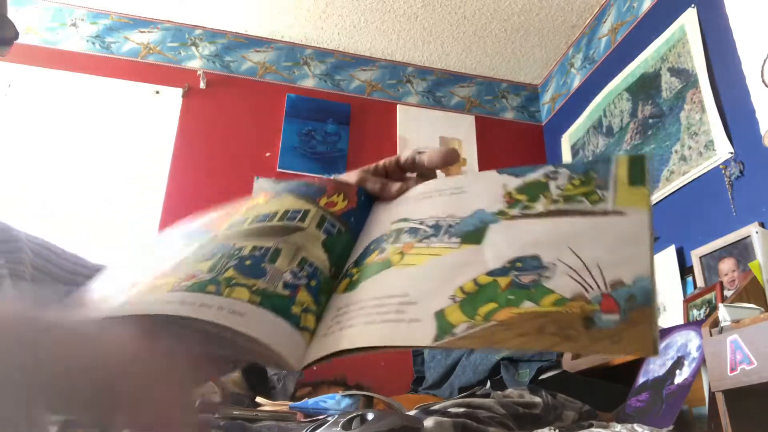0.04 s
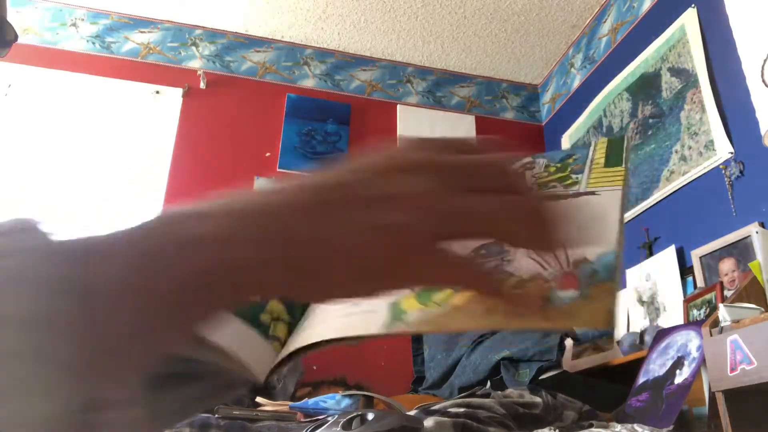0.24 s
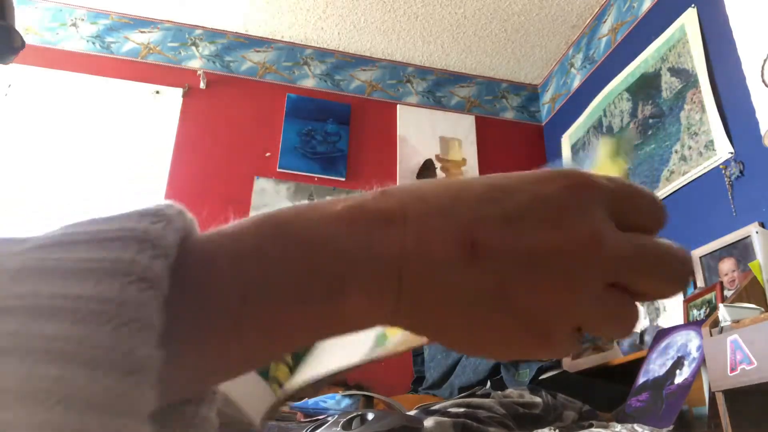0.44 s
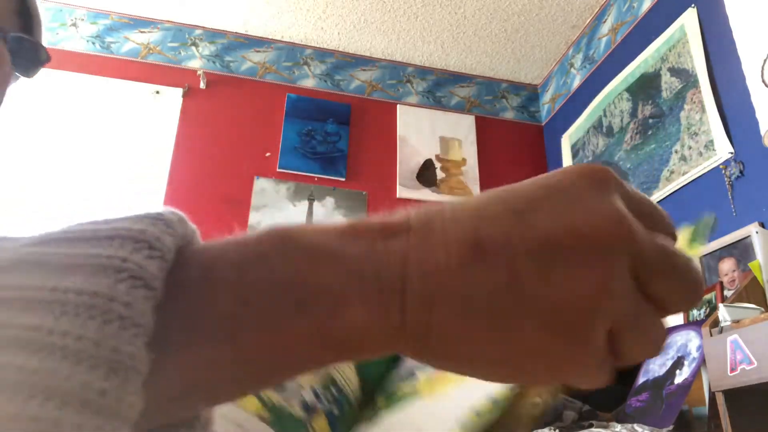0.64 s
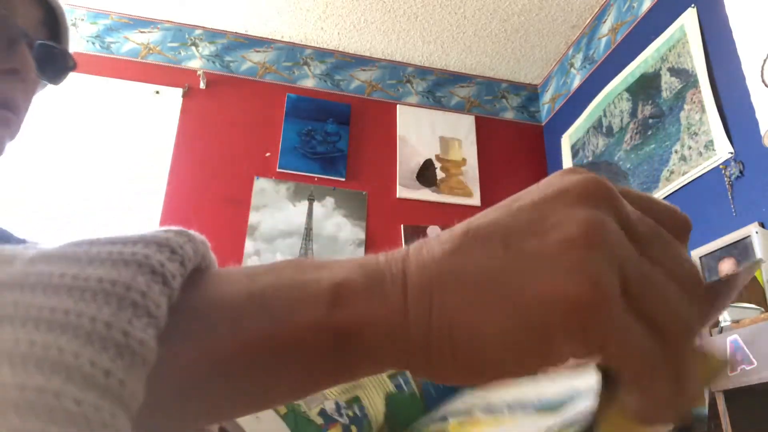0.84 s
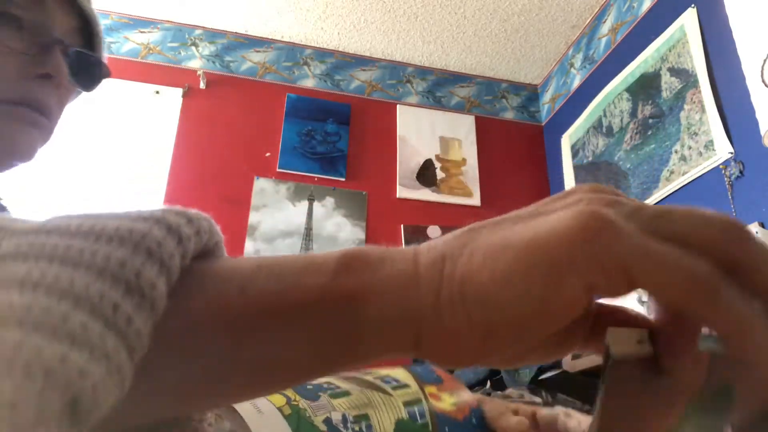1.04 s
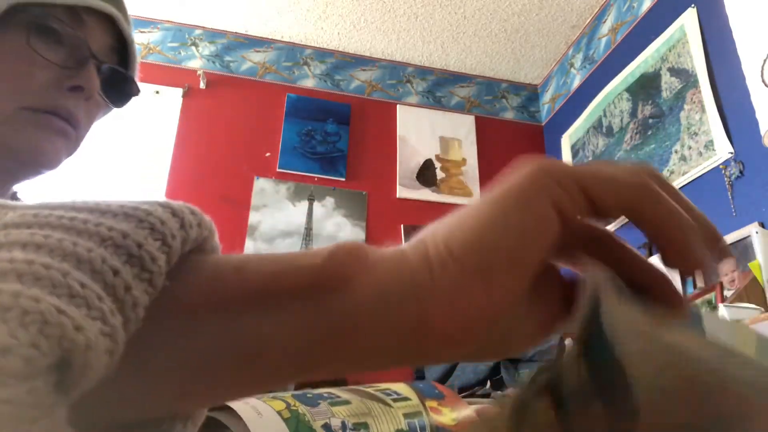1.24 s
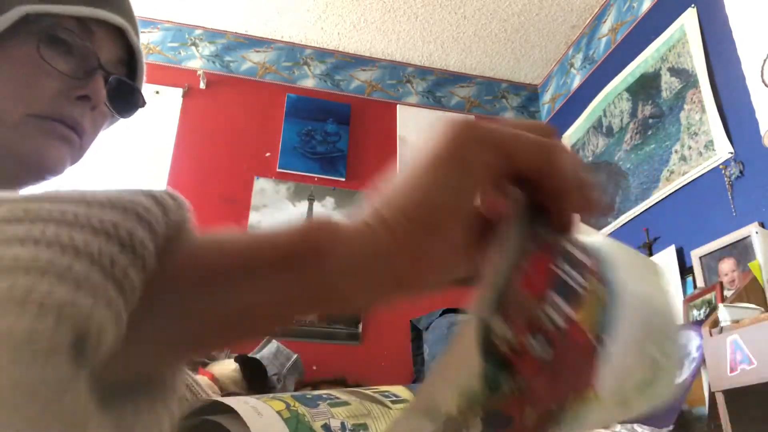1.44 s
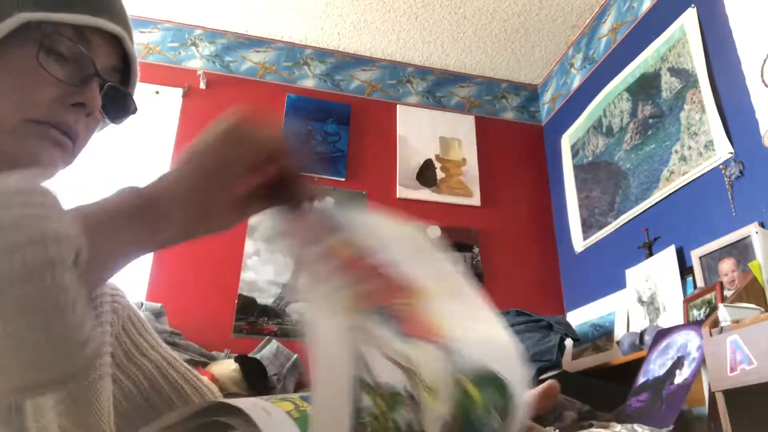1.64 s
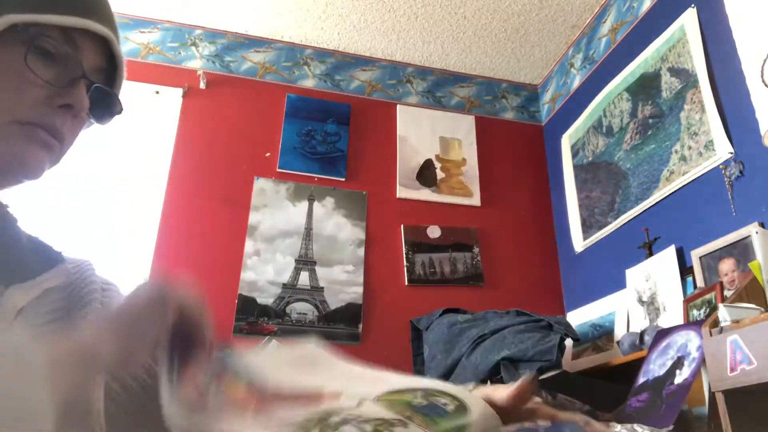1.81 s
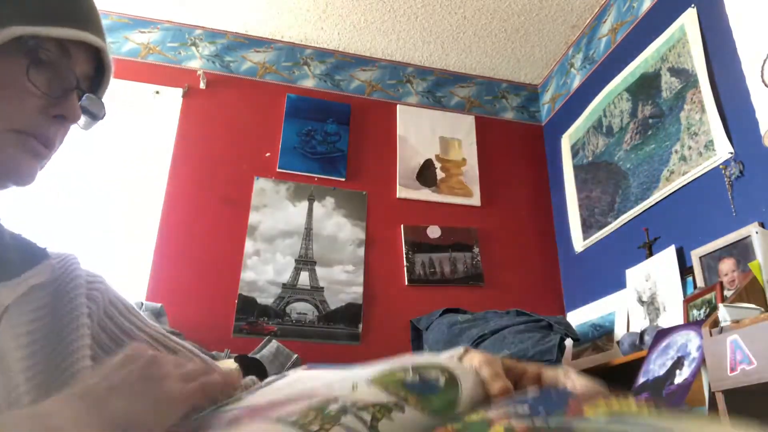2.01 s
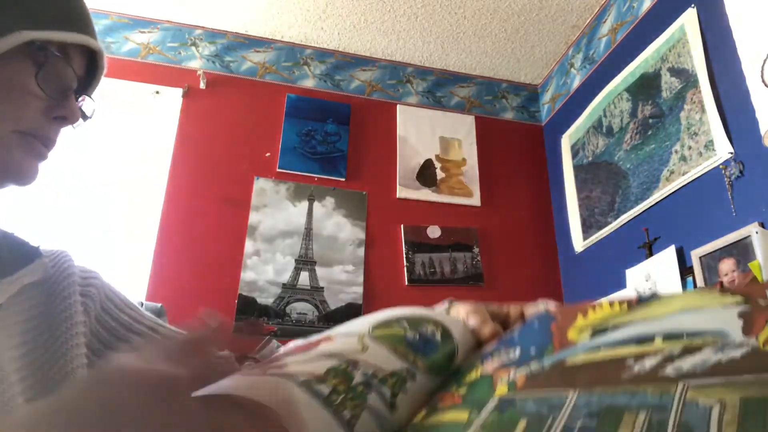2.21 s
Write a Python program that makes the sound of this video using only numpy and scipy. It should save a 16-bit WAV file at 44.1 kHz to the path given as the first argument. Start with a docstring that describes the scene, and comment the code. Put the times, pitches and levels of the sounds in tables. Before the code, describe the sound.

One thick picture-book page is lifted and turned by hand in a small quiet room, heard close; light rubbing grows into crisp rustling, sharp flaps and a slap, then brief soft brushing strokes.

```python
"""Turning a stiff picture-book page

A hand slides over a picture book, lifts one stiff page and turns it, close by in a quiet room. Slides are
grainy friction noise; the sheet buckles in short snaps whose bending waves arrive treble first.
Its edge sings in sinking bands, it wobbles in a low resonance, small patches ping and creases crackle;
the page slaps down on the others and the hand smooths it flat."""
import sys
import numpy as np
from scipy import signal
from scipy.fft import rfft, irfft
from scipy.io import wavfile
from scipy.ndimage import uniform_filter1d

SR = 44100
rng = np.random.default_rng(int(sys.argv[2]) if len(sys.argv) > 2 else 0)


def int16_out(signal):
    """Quantize to a 16-bit WAV file."""
    q = np.round(np.clip(np.atleast_2d(signal).T, -1, 1) * 32767)
    wavfile.write(sys.argv[1], SR, q.astype(np.int16))


N = 100062  # samples in the scene
SIZE = 32768  # samples in each separate sound
T = np.arange(SIZE) / SR  # s
HZ = np.fft.rfftfreq(SIZE, 1 / SR) + 1e-3  # kept just above zero for the divisions


def amp(db):
    """Decibels to gain."""
    return 10 ** (np.asarray(db) / 20)


def evened(x):
    """Scales to rms 1."""
    return x / np.sqrt(np.mean(x ** 2) + 1e-20)


def read(points, hz):
    """Reads a curve on a log-frequency axis."""
    point_hz, value = np.transpose(points)
    return np.interp(np.log(hz + 1), np.log(point_hz + 1), value)


def add(mix, start_s, sound):
    """Mixes a sound in at a time, trimmed to the ends of the scene."""
    start = round(start_s * SR)
    part = mix[max(start, 0):][:len(sound) + min(start, 0)]
    part += sound[max(-start, 0):][:len(part)]


# Tone of the quiet room. Each row: frequency in Hz, gain in dB.
AIR_COLOUR = [(25, -39), (50, -2.5), (105, 8), (220, -0.5), (600, -7), (1100, -5.5), (7000, -18),
              (16000, -29.5)]
AIR_DB = -70


def room_air():
    """Steady noise, coloured as the air of a quiet room."""
    spectrum = rfft(rng.standard_normal(N))
    colour_db = read(AIR_COLOUR, np.fft.rfftfreq(N, 1 / SR))
    return amp(AIR_DB) * evened(irfft(spectrum * amp(colour_db), N))


GRAINS_PER_S, GRAIN_SPREAD_DB = 2500, 2.5
GRAIN_SHARE = 0.58  # share of the power in grains, the rest in fine hiss


def friction(colour_db):
    """Paper fibres catch and let go: grains of uneven size in a fine hiss; rms 1."""
    size_db = GRAIN_SPREAD_DB * np.minimum(rng.exponential(1, SIZE), 4)
    catches = rng.random(SIZE) < GRAINS_PER_S / SR
    grains = evened(amp(size_db) * catches * rng.choice([-1, 1], SIZE))
    fine = rng.standard_normal(SIZE)
    x = np.sqrt(GRAIN_SHARE) * grains + np.sqrt(1 - GRAIN_SHARE) * fine
    return evened(irfft(rfft(x) * amp(colour_db)))


# Tone of the sheet's dull body under a slide. Each row: frequency in Hz, gain in dB.
BODY_COLOUR = [(60, -17), (250, -4.5), (650, 0.5), (1150, 1.5), (2300, -13.5), (4000, -34), (12000, -57)]
# Tone of the paper's surface hiss, before each slide's own tilt. Each row: frequency in Hz, gain in dB.
HISS_COLOUR = [(300, -24), (1500, -6), (2600, -3.5), (6500, -2), (9000, -9), (14000, -8.5)]
# Fingers and paper slide. Each row: start in seconds, rise in seconds, length in seconds, fade over the
# stroke in dB (negative sinks), body level in dB, hiss level in dB, hiss tilt above 2 kHz in dB/octave.
SLIDES = [ (0.119, 0.018, 0.22, -9.5, -73.5, -71, -3), (0.453, 0.035, 0.082, -4.5, -63.5, -65, -3),
          (0.714, 0.033, 0.17, -6.5, -55.5, -52.5, -9.5), (0.868, 0.022, 0.23, 2.5, -60.5, -61.5, -7.5),
          (1.104, 0.017, 0.076, -8, -55, -53, -7.5), (1.205, .04, .11, -8, -48, -50.5, -9),
          (1.309, 0.021, 0.063, -7, -45.5, -46, -4.5), (1.374, 0.034, 0.045, 0, -43, -55.5, -9),
          (1.502, 0.04, 0.027, -4, -42, -51, -5), (1.552, 0.024, 0.075, -11.5, -56, -63.5, -14.5),
          (1.694, 0.013, 0.088, -1, -41, -64, -23), (1.821, 0.0048, 0.15, -15, -53.5, -56.5, -6.5),
          (1.955, 0.0035, 0.17, -4.5, -61, -53.5, -4), (2.11, 0.0032, .14, -11.5, -62, -51.5, -11)]
RELEASE_S, FLUTTER_DB = 0.02, 2


def stroke(start_s, rise_s, length_s, fade_db, body_db, hiss_db, tilt_db):
    """A slide under wavering pressure: the sheet's dull body and the hiss of its surface."""
    slow = uniform_filter1d(rng.standard_normal(SIZE), size=400)
    pressure = evened(uniform_filter1d(slow, size=200))
    shape = np.minimum(T / rise_s, 1) * np.exp(-np.maximum(T - length_s, 0) / RELEASE_S)
    shape *= amp(fade_db * np.minimum(T / length_s, 1) + FLUTTER_DB * pressure)
    body = friction(read(BODY_COLOUR, HZ))
    hiss = friction(read(HISS_COLOUR, HZ) + tilt_db * np.log2(np.maximum(HZ, 2000)))
    return start_s, shape * (amp(body_db) * body + amp(hiss_db) * hiss)


# How long the room rings. Each row: frequency in Hz, time to fall by 60 dB in seconds.
ROOM_DECAY = [(300, 0.34), (1100, 0.32), (3000, 0.14), (16000, 0.19)]
ROOM_RISE_S = 0.0013


def room():
    """Spectrum of the room's tail, energy 1: noise that dies at its own pace in each band."""
    hz, t, z = signal.stft(rng.standard_normal(SIZE), SR, nperseg=256)
    decay = np.exp(-np.log(1000) * t / read(ROOM_DECAY, hz)[:, None])
    tail = signal.istft(z * decay, SR, nperseg=256)[1][:SIZE]
    tail *= (1 - np.exp(-T / ROOM_RISE_S)) ** 2
    return rfft(tail / np.linalg.norm(tail))


def burst(decay_s):
    """Spectrum of a spray of tiny clicks that swells and dies, energy 1."""
    x = rng.standard_normal(SIZE) * np.sqrt(T) * np.exp(-T / decay_s)
    return rfft(x / np.linalg.norm(x))


# Colour of the paper in a snap. Each row: frequency in Hz, gain in dB.
PAPER_COLOUR = [(40, 4), (330, 3), (620, 0), (1100, 2.5), (1900, -1), (2500, 2), (8000, 0.5), (16000, -44)]
# Colour of the tick at the paper's edge. Each row: frequency in Hz, gain in dB.
TICK_COLOUR = [(500, -41), (3000, 5.5), (7000, -0.5), (10000, -5), (14000, -7.5)]
# Sheet resonances rung by the rattle. Each row: frequency in Hz, peak gain in dB, width in Hz.
RATTLE_MODES = [(330.4, 7, 8.9), (1096, 1.5, 36), (2294, -2, 71)]
# The sheet buckles or lands. Each row: time in seconds, level in dB, corner in Hz, fall above the corner
# in dB/octave, low edge in Hz, edge tick in dB, rattle in dB against the clean pulse.
BUCKLES = [ (0.1213, -11.5, 2830, 35, 1700, -35.5, -13), (0.6276, -14.5, 814, 13, 350, -37, 1),
           (0.7728, -6, 1030, 30, 300, -46, -23), (0.9602, -6, 1020, 27, 460, -40, -14),
           (0.9924, -5, 1160, 11, 470, -39, -8), (1.0105, -7.5, 1500, 12, 423, -37, -0.5),
           (1.0564, -9, 2970, 35, 1190, -29.5, 1), (1.1585, -1, 1620, 21, 335, -26, -9),
           (1.1902, 0.5, 1020, 17, 493, -28, -14), (1.3117, -11, 1420, 10, 404, -24, 5),
           (1.3294, -15.5, 5050, 25, 700, -27, 10), (1.3567, -7.5, 5300, 32, 1200, -13, 6),
           (1.5523, -6, 1430, 10.5, 455, -30, 5), (1.578, -2.5, 1080, 11, 201, -29, -3),
           (1.6157, 7.5, 1280, 27, 295, -23, -14), (1.6514, 7, 1500, 16, 262, -23, -6.5),
           (1.6911, 6, 1590, 20, 333, -22.5, -7), (1.6946, 16.5, 1340, 14, 800, -46, -3.5),
           (1.722, 2, 1810, 14.5, 303, -25.5, 2), (1.7452, 6, 3300, 20, 557, -48, 2.5),
           (1.7499, 11, 2240, 14.5, 454, -33, 3.5), (1.8252, -5, 3160, 11.5, 298, -18.5, -3.5),
           (1.9291, -7.5, 1100, 9.5, 330, -27.5, -2.5), (1.9635, -7.5, 2500, 24, 250, -35, 4),
           (2.1104, -5.5, 2700, 13, 1700, -50, 2)]
TRAVEL_S, FAST_HZ = 0.002, 4003  # time the fastest bends take to cross the sheet, and their pitch
LOW_DB_PER_OCTAVE = 14.5  # fall below the low edge
RATTLE_S, TICK_S = 0.0033, 0.0016  # decays
ROOM_DB = -13  # room tail against the near sound


def snap(time_s, db, corner_hz, fall_db, low_hz, tick_db, rattle_db):
    """A bending pulse crosses the sheet, low notes last, rattles between its edges and reaches the room."""
    octaves_above = np.log2(1 + (HZ / corner_hz) ** 6) / 6
    octaves_below = np.log2(1 + (low_hz / HZ) ** 4) / 4
    pulse_db = db + read(PAPER_COLOUR, HZ) - fall_db * octaves_above - LOW_DB_PER_OCTAVE * octaves_below
    # bending waves travel at the square root of their frequency; summing the delay gives the phase
    lag_s = TRAVEL_S * np.maximum(np.sqrt(FAST_HZ / HZ) - 1, 0)
    turns = np.cumsum(lag_s) * SR / SIZE
    pulse = amp(pulse_db) * np.exp(-2j * np.pi * turns)
    ring = sum(amp(mode_db) / (1 + 2j * (HZ - hz) / width) for hz, mode_db, width in RATTLE_MODES)
    rattle = (1 + amp(rattle_db) * (burst(RATTLE_S) + ring)) / np.hypot(1, amp(rattle_db))
    tick = amp(tick_db + read(TICK_COLOUR, HZ)) * burst(TICK_S)
    near = pulse * rattle + tick
    heard = irfft(near * (1 + amp(ROOM_DB) * room()))
    lead = 256  # samples kept ahead of the snap for the onset's pre-ripple
    return time_s - lead / SR, np.roll(heard, lead)


def resonate(x, hz, width_hz):
    """A two-pole resonance that follows the curve hz; rms 1."""
    turn = np.exp(2j * np.pi * np.cumsum(hz) / SR)
    r = np.exp(-np.pi * width_hz / SR)  # both poles share this radius
    # shift the moving pitch to zero, smooth, and shift back
    smoothed = signal.lfilter([1], np.poly([r, r]), x / turn)
    return evened((turn * smoothed).real)


# An edge drags over the page and sings in a sinking band. Each row: start in seconds, length in seconds,
# start pitch in Hz, end pitch in Hz, level in dB.
EDGE_DRAGS = [(.755, 0.099, 1490, 1090, -51.5), (0.838, 0.086, 1360, 1050, -51),
              (1.38, 0.07, 1220, 1050, -50), (2.115, 0.028, 1510, 840, -49.5)]
SCRAPE_WIDTH_HZ = 330  # of each pole


def scrape(start_s, length_s, start_hz, end_hz, db):
    """Friction drives a resonance of the sheet, which sinks as the free part grows."""
    pitch = np.interp(T, [0, length_s], [start_hz, end_hz])
    band = resonate(friction(0), pitch, SCRAPE_WIDTH_HZ)
    swell = np.sqrt(abs(np.sin(np.pi * np.minimum(T / length_s, 1))))
    return start_s, amp(db) * swell * band


# The lifted sheet wobbles. Each row: start in seconds, level in dB, decay in seconds.
SHUDDERS = [(0.798, -46.5, 0.053), (1.063, -53.5, 0.13), (1.369, -56, 0.14), (1.601, -56, 0.15),
            (1.752, -53, 0.038)]
WOBBLE_START_HZ, WOBBLE_REST_HZ, WOBBLE_SAG_S = 187, 91, 0.021
WOBBLE_WIDTH_HZ, WOBBLE_LOW_HZ, WOBBLE_RISE_S = 127, 55.3, 0.0021  # width of each pole, low cut, attack


def wobble(start_s, db, decay_s):
    """The sheet shudders in its lowest mode, which sinks as the bend relaxes."""
    hz = WOBBLE_REST_HZ + (WOBBLE_START_HZ - WOBBLE_REST_HZ) * np.exp(-T / WOBBLE_SAG_S)
    low_cut = signal.butter(2, WOBBLE_LOW_HZ, "high", fs=SR)
    drive = signal.lfilter(*low_cut, rng.standard_normal(SIZE))
    shudder = resonate(drive, hz, WOBBLE_WIDTH_HZ)
    shape = np.minimum(T / WOBBLE_RISE_S, 1) * np.exp(-T / decay_s)
    return start_s, amp(db) * shape * shudder


# A small facet of the paper pops and rings. Each row: time in seconds, pitch in Hz, peak level in dB.
POPS = [(1.056, 4390, -47.5), (1.356, 4380, -32), (1.6946, 1086, -22.5)]
PING_RISE_S, PING_DECAY_S = 0.0012, 0.003


def ping(time_s, hz, db):
    """A patch of paper flips over and rings as a sine for a few milliseconds."""
    shape = (1 - np.exp(-T / PING_RISE_S)) * np.exp(-T / PING_DECAY_S)
    return time_s, amp(db) * shape / shape.max() * np.sin(2 * np.pi * hz * T)


SWING_START_S, SWING_END_S = 1.5, 1.85
CRACKLES_PER_S, CRACKLE_DB, CRACKLE_HZ = 60, -21.5, 2030  # rate, softest level, middle corner


def crackles():
    """Creases crackle as the page swings over: rows for tiny snaps of random time, size and pitch."""
    wait, size, octave = rng.random((40, 3)).T
    times = SWING_START_S - np.cumsum(np.log(1 - wait)) / CRACKLES_PER_S
    levels = CRACKLE_DB + 10 * size
    corners = CRACKLE_HZ * 2 ** (2 * octave - 1)  # within an octave either way
    rows = zip(times, levels, corners)
    return [(s, db, hz, 20, hz / 2, db - 30.5, 0) for s, db, hz in rows if s < SWING_END_S]


def scene():
    """Room air and all that the page does."""
    mix = room_air()
    layers = [(stroke, SLIDES), (snap, BUCKLES), (scrape, EDGE_DRAGS),
              (wobble, SHUDDERS), (ping, POPS), (snap, crackles())]
    for source, rows in layers:
        for row in rows:
            add(mix, *source(*row))
    return mix[None]


def record(dry):
    """A steep linear-phase low-pass trims the extreme treble."""
    low_pass = signal.firwin(511, 16100, window=("kaiser", 9), fs=SR)  # cutoff in Hz
    return signal.oaconvolve(dry, low_pass[None], "same")


dry = scene()
out = record(dry)
int16_out(out)
```